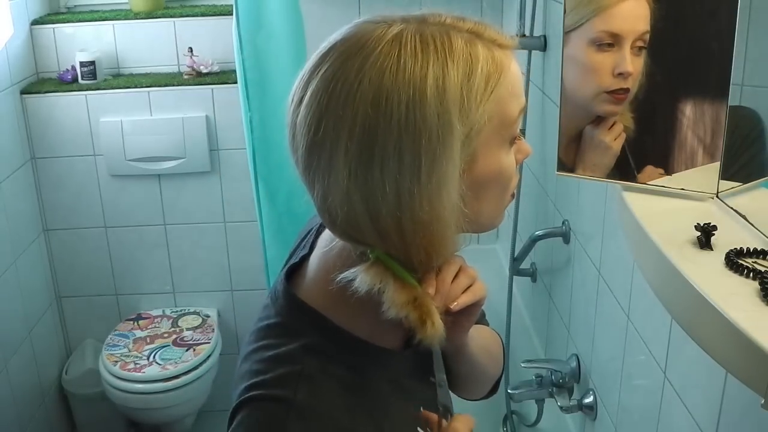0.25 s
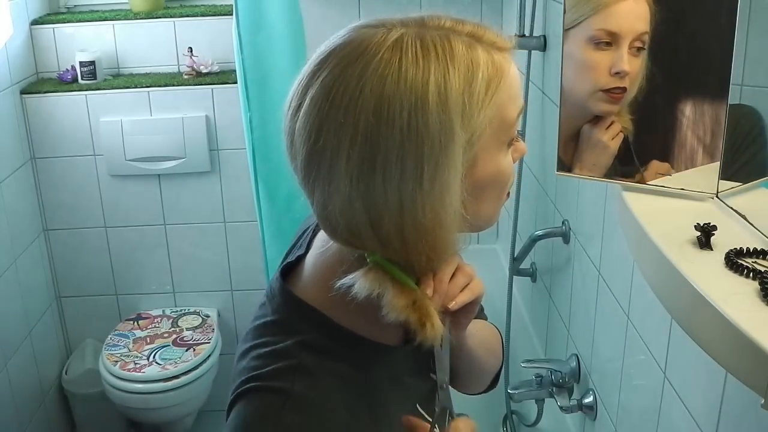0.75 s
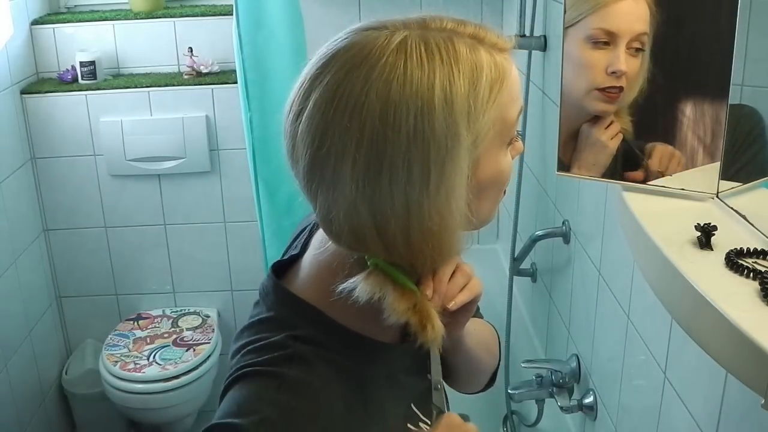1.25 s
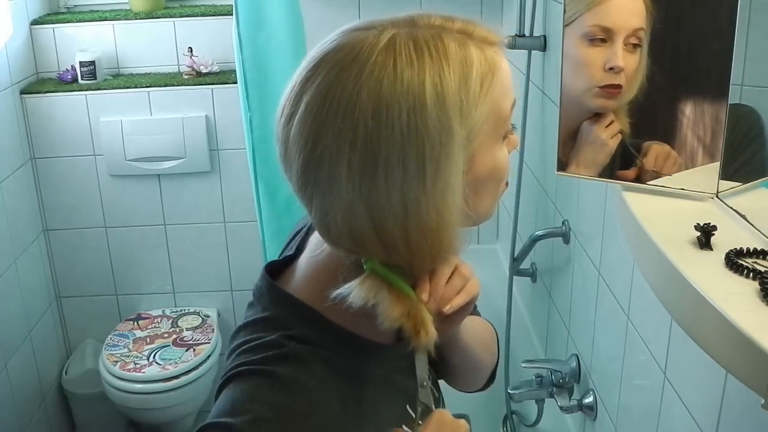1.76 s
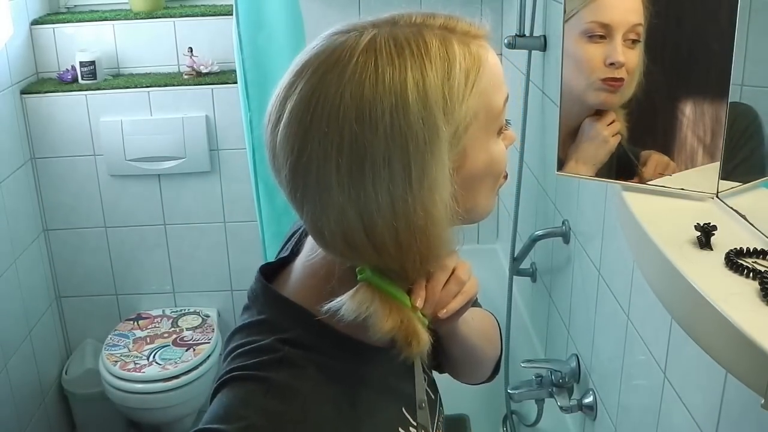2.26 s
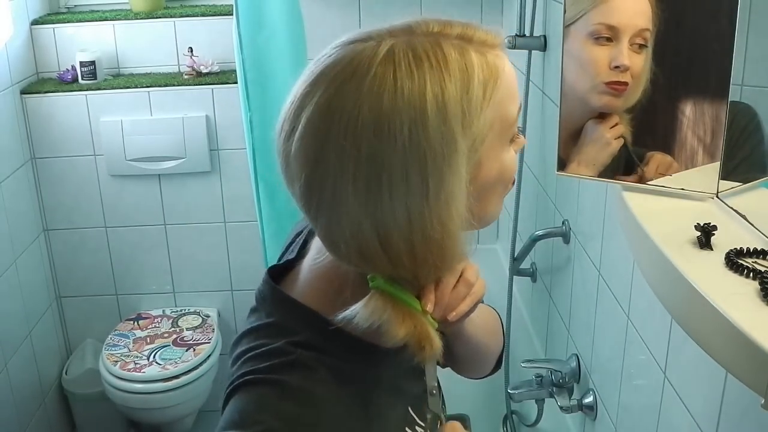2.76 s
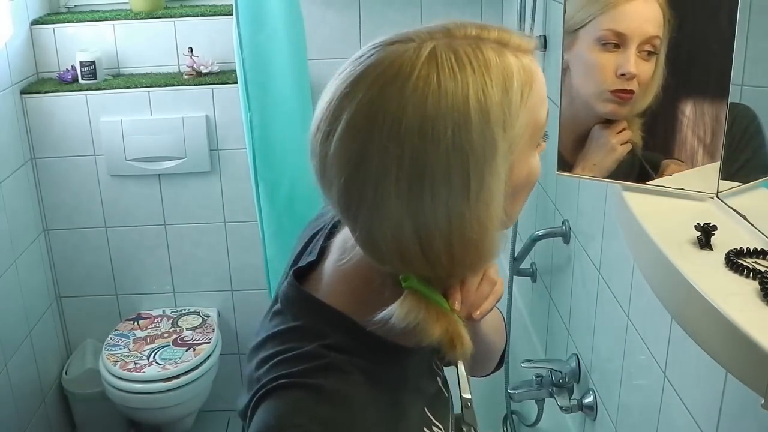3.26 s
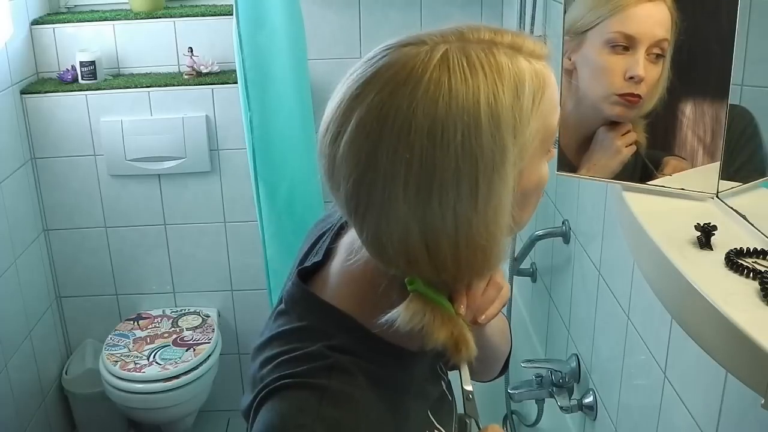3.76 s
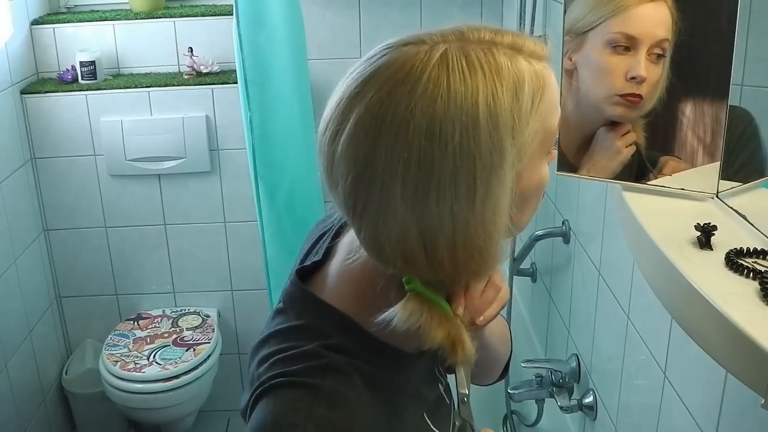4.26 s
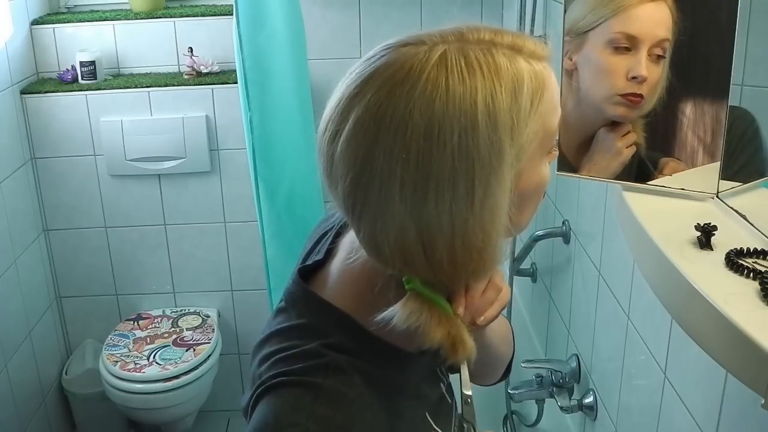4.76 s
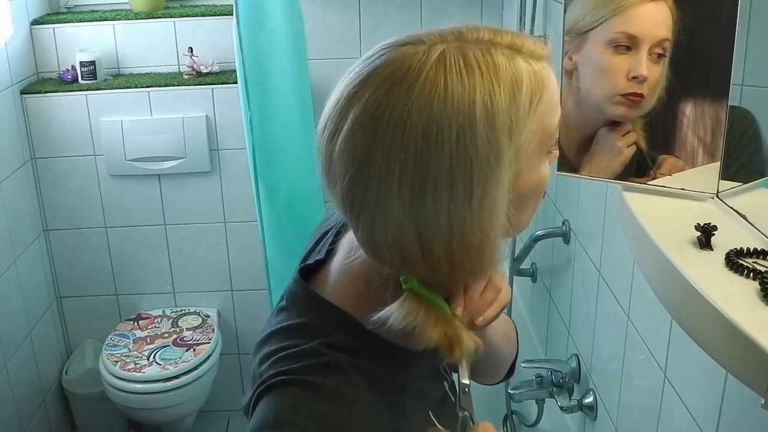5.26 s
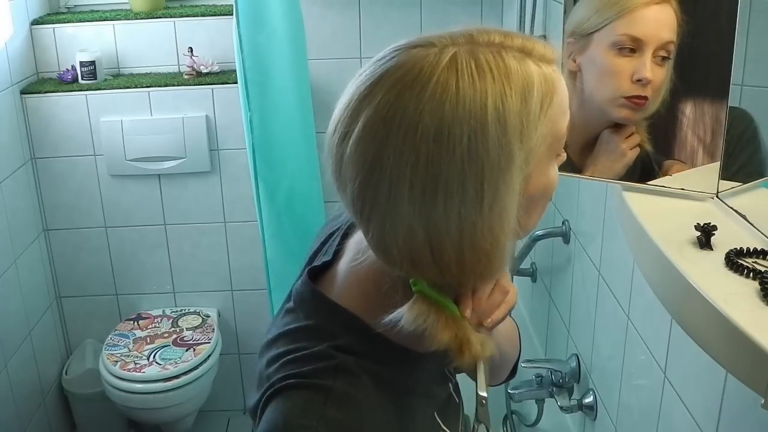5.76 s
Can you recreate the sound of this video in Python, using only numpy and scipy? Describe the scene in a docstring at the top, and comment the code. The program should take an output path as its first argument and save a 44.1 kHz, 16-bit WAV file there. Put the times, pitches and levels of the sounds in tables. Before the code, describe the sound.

In a tiled bathroom, close scissors crunch through hair in regular bright snips, growing firmer, over a faint distant engine hum.

```python
"""A small tiled bathroom: steel scissors snip through a bunch of hair about three times a second.
Each stroke is a swelling crunch of random grains, then a click that rings the blades; the tiles
answer with echoes and a dense tail. Knocks ring the handles. A far engine hums through the wall as
a gliding sine, over filtered-noise rumble and hiss, faint low sines, and soft blips on the right."""
import sys
import numpy as np
from scipy import signal
from scipy.fft import rfft, irfft
from scipy.io import wavfile
from scipy.ndimage import uniform_filter1d

SR = 44100
rng = np.random.default_rng(int(sys.argv[2]) if len(sys.argv) > 2 else 0)


def pcm_store(signal):
    """Save signal as 16-bit PCM."""
    levels = np.round(np.clip(np.atleast_2d(signal), -1, 1) * 32767)
    wavfile.write(sys.argv[1], SR, levels.astype(np.int16).T)


def invert_db(level):
    """Linear amplitude ratio for a level in decibels (20 dB per decade), elementwise."""
    return 10 ** (np.asarray(level, dtype=float) / 20)


N = 265380
T = np.arange(N) / SR


def curve(table, x):
    """Every column of a table, read at x along straight lines."""
    first, *columns = np.transpose(table)
    return [np.interp(x, first, c) for c in columns]


def colour(x, table, share=1):
    """Causal filter through (hz, gain_db) points, made from the cepstrum of its log gain."""
    hz, db = np.transpose(table)
    bins_hz = np.arange(1025) * SR / 2048 + 1
    gain_db = share * np.interp(np.log(bins_hz), np.log(hz), db)
    cepstrum = irfft(np.log(invert_db(gain_db)))
    # fold onto positive time: minimum phase
    cepstrum[1:1024] *= 2
    cepstrum[1025:] = 0
    impulse = irfft(np.exp(rfft(cepstrum)))
    return signal.fftconvolve(np.atleast_2d(x), impulse[None], axes=1)[:, :np.shape(x)[-1]]


def level(x, db):
    """x at an rms of db."""
    return x * invert_db(db) / np.sqrt(np.mean(x ** 2))


def walk(rate_hz):
    """Random levels held 1 / rate_hz and slewed twice; spread near 1."""
    hold = int(SR / rate_hz)
    steps = np.repeat(rng.standard_normal(N // hold + 1), hold)
    return 1.3 * uniform_filter1d(uniform_filter1d(steps, hold), hold)[:N]


# far engine speed and loudness: (time_s, firing_hz, level_db)
ENGINE_COURSE = [(0, 59.7, -70), (.3, 59.7, -65.5), (.6, 59.5, -67), (1.1, 55.3, -75.5), (1.5, 59.1, -59),
                 (1.8, 52.3, -90), (2.3, 51.3, -66), (3.3, 51.12, -68), (3.75, 50, -66.5), (3.95, 48, -53),
                 (4.3, 54, -59), (4.55, 56.4, -56), (4.8, 59.3, -62.5), (5.18, 64.2, -56.5),
                 (5.4, 64, -77.5), (6.02, 63, -69.5)]
ENGINE_WAVER_DB, ENGINE_DRIFT_HZ = 3, 4


def engine(side_rad=0.72):
    """Only the firing rate comes through the wall: one sine, uneven in level and pitch."""
    hz, db = curve(ENGINE_COURSE, T)
    phase = 2 * np.pi * np.cumsum(hz + ENGINE_DRIFT_HZ * walk(5.5)) / SR
    gain = np.sqrt(2) * invert_db(db + ENGINE_WAVER_DB * walk(22))
    return gain * np.sin(phase + np.array([[-side_rad], [side_rad]]))


# low tones: (pitch_hz, level_db)
HUM_TONES = [(120, -72), (156, -75.5)]
HUM_WAVER_DB = 7


def hums(drift_hz=3., side_rad=1.0):
    """Faint low sines that swell and fade at random."""
    out = 0
    for hz, db in HUM_TONES:
        phase = 2 * np.pi * np.cumsum(hz + drift_hz * walk(17)) / SR
        gain = invert_db(db + HUM_WAVER_DB * walk(11))
        out = out + gain * np.sin(phase + np.array([[-side_rad], [side_rad]]))
    return out


# noise spectra of low rumble, upper rumble and hiss: (freq_hz, gain_db)
RUMBLE_COLOUR = [(30, -19.5), (50, 2.5), (120, 5.5), (190, 3), (260, -16), (400, -29.5), (700, -55),
                 (1000, -64.5)]
UPPER_COLOUR = [(120, -26.5), (190, -7.5), (250, 3), (310, -17), (380, -29.5), (500, -52.5)]
HISS_COLOUR = [(600, -1), (1050, -6.5), (1500, -1), (2200, -7.2), (3000, -9.5), (5500, -11.5), (7000, -14),
               (9200, -15.5), (10500, -30.5), (13000, -27), (15000, -20)]
# two swells of the upper rumble: (peak_s, level_db, rise_s, fall_s)
UPPER_SWELLS = [(1.198, -68.5, 0.062, 0.15), (1.408, -48, 0.051, 0.027)]
RUMBLE_DB, UPPER_DB, HISS_DB = -63.5, -71, -62.5
RUMBLE_WAVER_DB, UPPER_WAVER_DB, HISS_WAVER_DB = 3.5, 2.5, 0.6


def background():
    """Rumble and hiss: coloured noise, unrelated left and right, each wavering a little."""
    low = level(colour(rng.standard_normal((2, N)), RUMBLE_COLOUR), RUMBLE_DB)
    low = low * invert_db(RUMBLE_WAVER_DB * walk(11))
    swells = np.zeros(N)
    for peak_s, db, rise_s, fall_s in UPPER_SWELLS:
        away = np.where(T < peak_s, (peak_s - T) / rise_s, (T - peak_s) / fall_s)
        swells += invert_db(db) * np.exp(-away)
    upper = level(colour(rng.standard_normal((2, N)), UPPER_COLOUR), 0)
    upper = upper * (invert_db(UPPER_DB + UPPER_WAVER_DB * walk(2.6)) + swells)
    hiss = level(colour(rng.standard_normal((2, N)), HISS_COLOUR), HISS_DB)
    hiss = hiss * invert_db(HISS_WAVER_DB * walk(5))
    return low + upper + hiss


# clearest blips, levels before the final doubling: (mark_s, relative_db, pitch_hz, length_ms)
BLIP_EVENTS = [(0.021, -60, 412, 70), (0.785, -53.5, 420, 36), (0.83, -48, 450, 56), (1.198, -55, 452, 50),
               (1.329, -51, 455, 54), (1.472, -55, 455, 51), (1.649, -56.5, 428, 31),
               (1.833, -53.5, 450, 44), (2.32, -63.5, 412, 42), (2.554, -60.5, 428, 31)]
# throbbing stretches, levels likewise: (start_s, length_s, relative_db, blur_relative_db)
THROB_SPANS = [(0.321, 0.35, -63, -80.5), (0.943, .23, -62.5, -71.5), (1.375, 0.1524, -61, -69.5),
               (1.732, 0.19, -70.5, -76.5)]
THROB_HZ, THROB_S, THROB_EDGE_S = 452, 0.064, 0.005


def blips(left_db=-27.5, lead_share=0.069, waver_hz=15.5):
    """Short soft wavering sines over stretches of blurred throbbing, almost only on the right."""
    blur_colour = [(300, -59.0), (370, 9.0), (450, -10.7), (500, -21), (560, -44.0)]
    blur = level(colour(rng.standard_normal(N), blur_colour)[0], 0)
    waver = 2 * np.pi * np.cumsum(waver_hz * walk(40)) / SR
    out = np.zeros(N)
    for start_s, length_s, db, blur_db in THROB_SPANS:
        age_s = T - start_s
        gate = np.clip(np.minimum(age_s, start_s + length_s - T) / THROB_EDGE_S, 0, 1)
        throb = np.abs(np.sin(np.pi * age_s / THROB_S)) * np.sin(2 * np.pi * THROB_HZ * T + waver)
        out += gate * (invert_db(db) * throb + invert_db(blur_db) * blur)
    for mark_s, db, hz, length_ms in BLIP_EVENTS:
        # each begins lead_share of its length ahead of the mark
        age = np.clip((T - mark_s) * 1000 / length_ms + lead_share, 0, 1)
        swell = np.sin(np.pi * age ** 0.52) ** 2
        out += invert_db(db) * swell * np.sin(2 * np.pi * hz * T + waver)
    return 2 * out * np.array([[invert_db(left_db)], [1]])


def ring(modes, force):
    """Sum of decaying modes pushed by a force."""
    out = 0
    for hz, gain_db, t60_s in modes:
        pole = np.exp(2j * np.pi * hz / SR - np.log(1000) / (t60_s * SR))
        out = out + invert_db(gain_db) * signal.lfilter([1], [1, -pole], force).imag
    return out


# colour of hair and click as they reach the microphones: (freq_hz, gain_db)
CRUNCH_COLOUR = [(500, -107), (1050, -48), (1500, -38.5), (2000, -18), (2500, 12), (3700, 4.5), (5000, 10),
                 (5800, 5), (7000, 3), (9300, 6), (10600, -3.5), (14000, 2), (15500, -13)]
# ringing blades: (mode_hz, gain_db, t60_s)
BLADE_MODES = [(2353.5, -14, 0.093), (2523, -14.5, 0.16), (2728, -15.5, 0.14), (2430, -12, 0.11),
               (2967, -12, 0.061), (3206, -8, 0.029), (3436, -3.5, 0.011), (4100, -24.5, 0.095),
               (4950, -20, 0.027), (5260, -1.5, 0.049), (9270, -37.5, 0.14)]
# samples kept ahead of blade closing
LEAD = SR // 5
GRAIN_DB, LUMP_DB, TURN_DB = 3, 1.5, 1.2
# blades slide before they meet the hair: dB relative to the first bite, fade-in
SLIDE_DB, SLIDE_MS = -4, 9
# steel chatter after the blow: dB relative to the blow, decay
CHATTER_DB, CHATTER_MS = -4, 0.7


def snip(click_db, stroke_ms, crunch_db, swell_db, bright, bend=1.52, release_ms=2.1,
         click_bright=1.06, ring_db=-25):
    """Hairs snap as dense uneven grains while the blades close; then steel meets steel."""
    t = (np.arange(LEAD + SR // 8) - LEAD) / SR
    snaps = rng.standard_normal(len(t))
    patches = rng.standard_normal(len(t))
    signs = rng.choice([-1, 1], len(t))
    # thicker and thinner strands: lumps of a few ms
    lumps = level(uniform_filter1d(patches, size=130), 0)
    sizes = np.minimum(rng.exponential(size=len(t)), 4)
    grains = level(snaps * invert_db(GRAIN_DB * sizes + LUMP_DB * lumps), 0)

    open_share = np.clip(-t * 1000 / stroke_ms, 0, 1)
    after_ms = np.clip(t, 0, 1) * 1000
    early_ms = np.clip(-t * 1000 - stroke_ms, 0, None)
    # the bite starts at once, grows fast, levels off, dies once the blades are shut
    bite = invert_db(crunch_db - swell_db * open_share ** bend) * np.exp(-after_ms / release_ms)
    slide = invert_db(SLIDE_DB) * np.exp(-early_ms / SLIDE_MS)
    bite = bite * np.where(early_ms > 0, slide, 1)
    chatter = invert_db(CHATTER_DB) * signs * np.exp(-after_ms / CHATTER_MS) * (t > 0)
    click = invert_db(click_db) * ((t == 0) + chatter)

    # 4 dB over four octaves: share is in dB per octave
    tilt = [(1000, -2), (16000, 2)]
    force = colour(grains * bite, tilt, share=bright)[0]
    force = force + colour(click, tilt, share=bright + click_bright)[0]
    # the hand turns the blades a little each time
    turn = [(hz, TURN_DB * rng.standard_normal()) for hz in (2000, 2800, 4000, 5600, 9000, 13000)]
    force = colour(force, turn)[0]
    return colour(force, CRUNCH_COLOUR)[0] + invert_db(ring_db) * ring(BLADE_MODES, force)


# nearest tiled walls: (delay_ms, gain_db)
WALL_ECHOES = [(4.2, -5), (7.4, -9), (8.6, -10)]
# tail decay: (freq_hz, t60_s)
TAIL_T60 = [(800, 0.33), (2500, 0.3), (5000, 0.22), (9000, 0.18), (15000, 0.15)]
# tail energy relative to an echo of gain 1; share of noise common to both ports
TAIL_DB, TAIL_LIKENESS = 2.5, 0.32
LEFT_LAG_SAMPLES = 2


def bathroom(x, build_ms=2.0):
    """Direct sound, wall echoes and a dense tail that loses its treble first; new on every call."""
    t = np.arange(SR // 2) / SR
    same = rng.standard_normal(len(t))
    apart = rng.standard_normal((2, len(t)))
    noise = TAIL_LIKENESS * same + (1 - TAIL_LIKENESS) * apart
    hz, s, frames = signal.stft(noise, SR, nperseg=128)
    frames = frames * invert_db(-60 * s[None] / curve(TAIL_T60, hz)[0][:, None])
    tail = signal.istft(frames, SR, nperseg=128)[1][:, :len(t)]
    tail = tail * (1 - np.exp(-t * 1000 / build_ms))
    reply = invert_db(TAIL_DB) * tail / np.sqrt(np.sum(tail ** 2, axis=1, keepdims=True))
    # paths from the right reach the left port later
    for delay_ms, db in [(0, 0.005)] + WALL_ECHOES:
        at = int(delay_ms * SR / 1000)
        reply[0, at + LEFT_LAG_SAMPLES] += invert_db(db)
        reply[1, at] += invert_db(db)
    return signal.fftconvolve(x[None], reply, axes=1)


# strokes, levels before colour and room: (shut_s, click_relative_db, stroke_ms, crunch_relative_db)
STROKES = [(0.0237, -26, 42, -52.5), (0.3342, -26.5, 28, -50.5), (0.6446, -24.5, 38, -50.5),
           (0.9478, -30.5, 24, -66), (1.346, -63, 46, -72.5), (1.6518, -25.5, 63.6, -51),
           (1.9376, -23.5, 29.6, -51), (2.272, -21.5, 32, -48.5), (2.6243, -33.5, 57.5, -48),
           (2.9103, -24, 27, -43), (3.2543, -24.5, 47.6, -44.5), (3.5616, -25, 46.5, -45.5),
           (3.8651, -26, 55, -46), (4.1946, -24, 81, -48), (4.491, -18.5, 34, -43),
           (4.7976, -17.5, 31, -43), (5.1097, -19, 36, -45), (5.4009, -18.5, 23.7, -45.5),
           (5.7012, -30, 27, -61.5)]
# crunch of a firm stroke, its swell and its brightness
FIRM_DB, FIRM_SWELL_DB, FIRM_BRIGHT_DB_PER_OCT = -40, 13.5, 5
# loss of swell and brightness per dB less crunch
SWELL_PER_DB, BRIGHT_PER_DB = 0.1236, 0.202


def scissors():
    """Every snip with the room's answer, at its moment; firmer strokes swell more and are brighter."""
    out = np.zeros((2, LEAD + N + SR))
    for shut_s, click_db, stroke_ms, crunch_db in STROKES:
        over_db = crunch_db - FIRM_DB
        swell_db = FIRM_SWELL_DB + SWELL_PER_DB * over_db
        bright = FIRM_BRIGHT_DB_PER_OCT + BRIGHT_PER_DB * over_db
        heard = bathroom(snip(click_db, stroke_ms, crunch_db, swell_db, bright))
        start = int(shut_s * SR)
        out[:, start:start + heard.shape[1]] += heard
    return out[:, LEAD:LEAD + N]


# handles meeting at the end of firmer strokes: (start_s, blow_relative_db)
HANDLE_BLOWS = [(0.333, -66.5), (0.642, -65), (2.272, -63), (2.909, -58.5), (3.253, -61.5), (3.559, -57),
                (4.196, -62), (4.49, -57.5), (4.8, -58.5), (5.109, -59.5), (5.402, -59.5)]
# ringing handles: (mode_hz, gain_db, t60_s)
HANDLE_MODES = [(804, 1.5, 0.14), (1274, -12.5, 0.18), (1460, -1, 0.11), (1742, -23.5, 0.017),
                (1760, 5, .06)]


def handles():
    """Each knock is an impulse that rings the low modes of the handles, with no room added."""
    blows = np.zeros(N)
    for start_s, db in HANDLE_BLOWS:
        blows[int(start_s * SR)] = invert_db(db)
    return ring(HANDLE_MODES, blows)


def scene():
    """Scissors in the bathroom over the background."""
    return engine() + hums() + background() + blips() + scissors() + handles()


# rise over the steady background at which a bin passes: (freq_hz, threshold_db)
SUPPRESS_BAR = [(250, -1.5), (340, 8), (1000, 10.5), (1750, 8), (2100, -1.5), (6500, -1), (8000, -2),
                (12000, -0.5), (15000, 9.5)]
SUPPRESS_FLOOR_DB = -42


def suppressor(x):
    """Takes the steady background out of each bin; what pokes above it stays as short flecks."""
    hz, s, frames = signal.stft(x, SR, nperseg=2048)
    power = np.abs(frames) ** 2 + 1e-18
    steady = np.quantile(power, .3, axis=2, keepdims=True)
    bar = steady * invert_db(2 * curve(SUPPRESS_BAR, hz)[0])[:, None]
    gain = np.sqrt(np.maximum(1 - bar / power, invert_db(2 * SUPPRESS_FLOOR_DB)))
    return signal.istft(frames * gain, SR, nperseg=2048)[1][:, :N]


def top_cut(x):
    """Nothing passes above the cut-off."""
    return signal.sosfilt(signal.butter(12, 16650, fs=SR, output="sos"), x)


# difference of the two ports: (freq_hz, left_minus_right_db)
PORT_COLOUR = [(300, -0.4), (1300, 7.5), (4400, 2), (8100, 4), (11000, -3), (15000, -5.5)]
NOTCH_HZ, NOTCH_WIDTH_HZ, TOP_HZ = 7797, 2570, 16000


def record(dry):
    """Two microphone ports of unlike colour, a treble dip, a cut top, then a noise suppressor."""
    left = colour(dry[0], PORT_COLOUR, share=.5)
    right = colour(dry[1], PORT_COLOUR, share=-.5)
    b, a = signal.iirnotch(NOTCH_HZ, NOTCH_HZ / NOTCH_WIDTH_HZ, SR)
    dipped = signal.lfilter(b, a, np.vstack([left, right]))
    top = signal.ellip(8, .5, 60, TOP_HZ, fs=SR, output="sos")
    mix = suppressor(signal.sosfilt(top, dipped))
    return top_cut(mix)


dry = scene()
out = record(dry)
pcm_store(out)
```